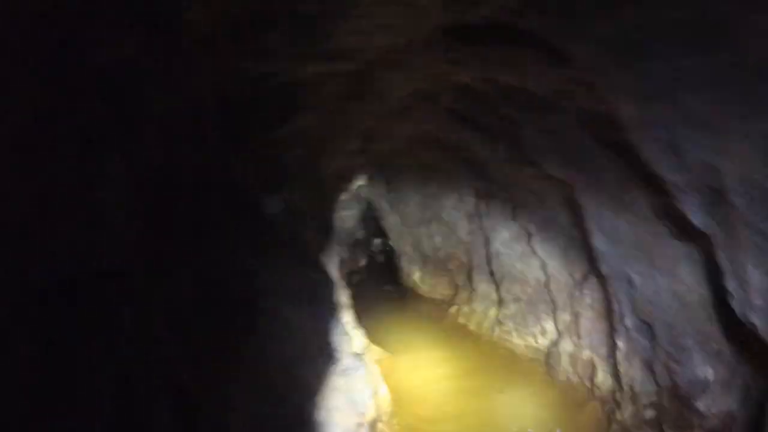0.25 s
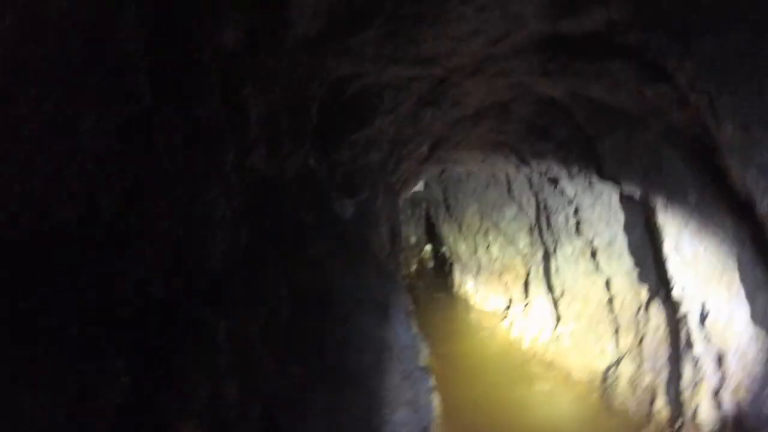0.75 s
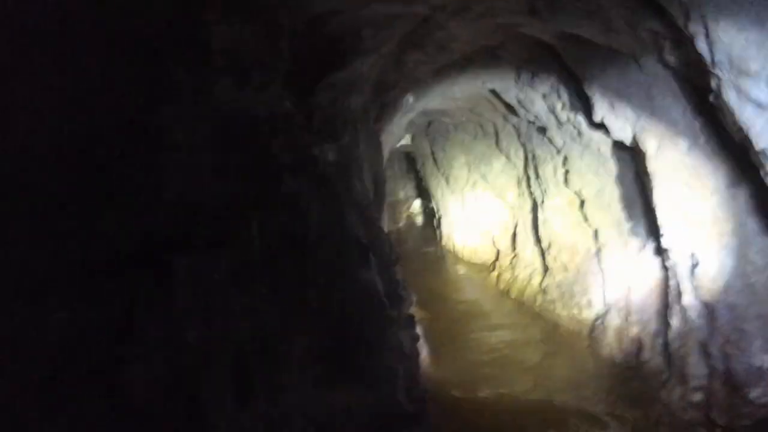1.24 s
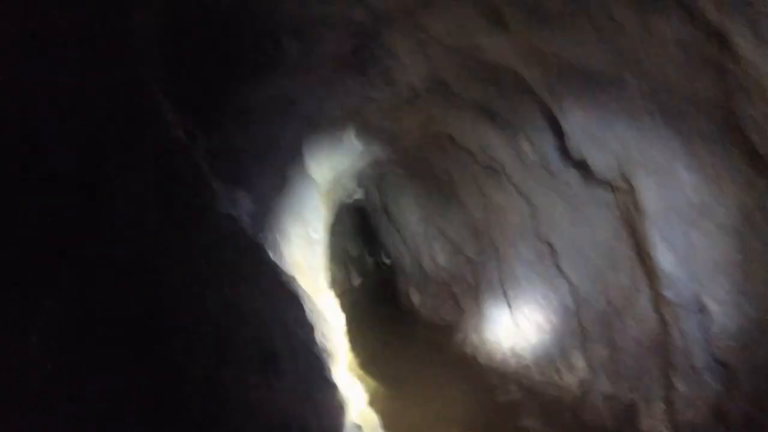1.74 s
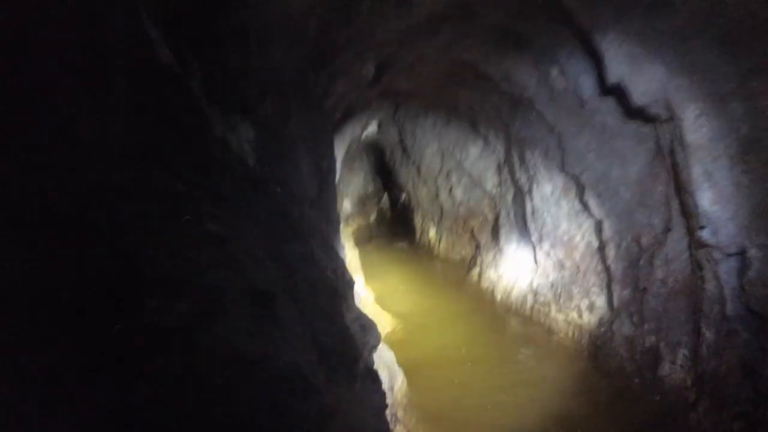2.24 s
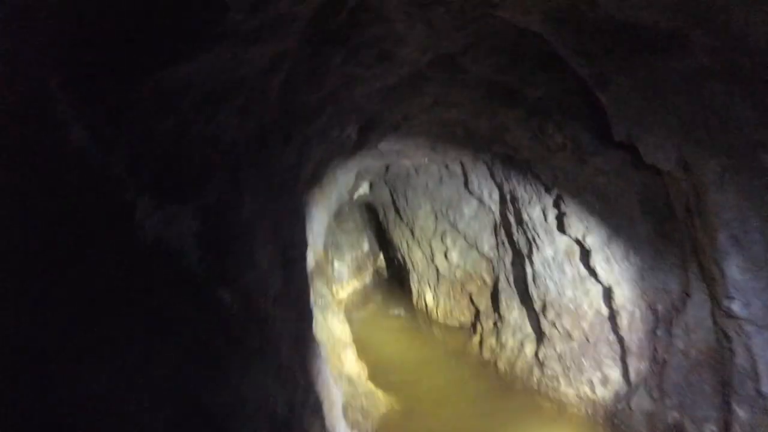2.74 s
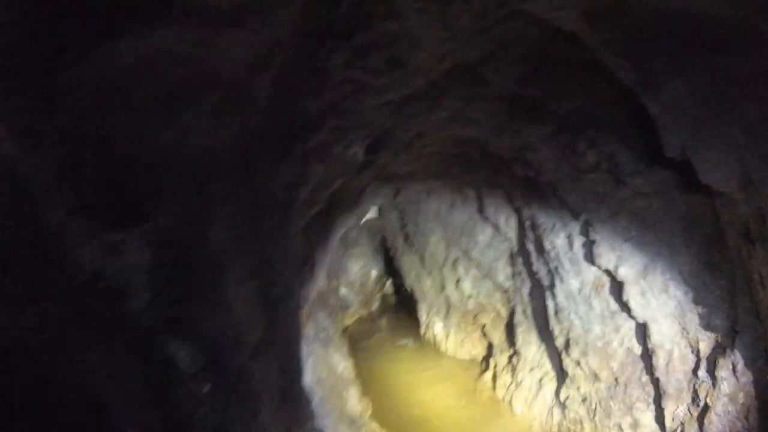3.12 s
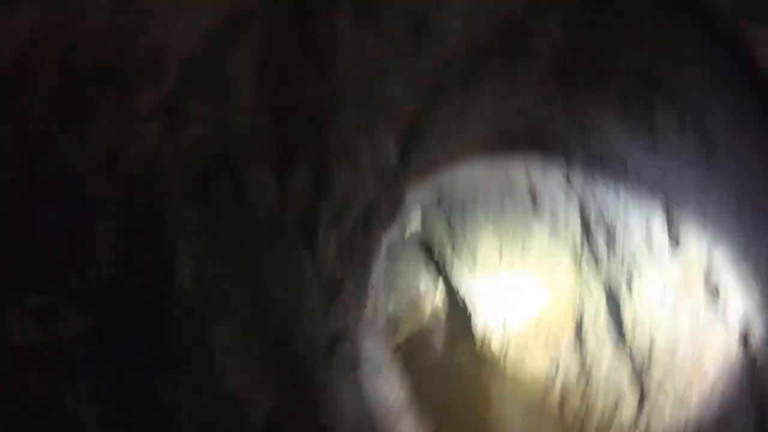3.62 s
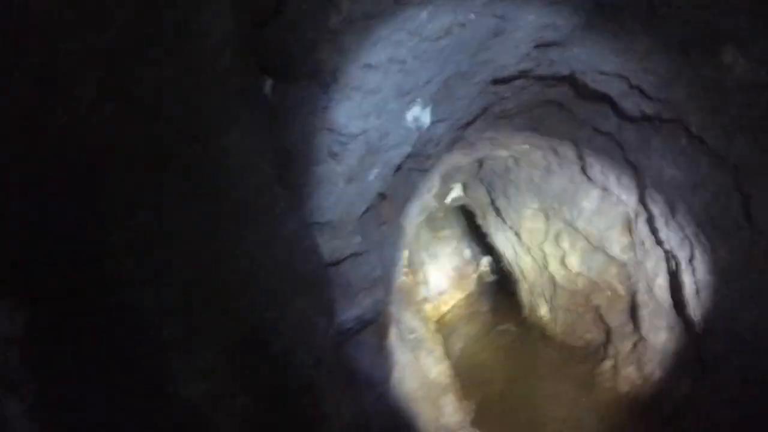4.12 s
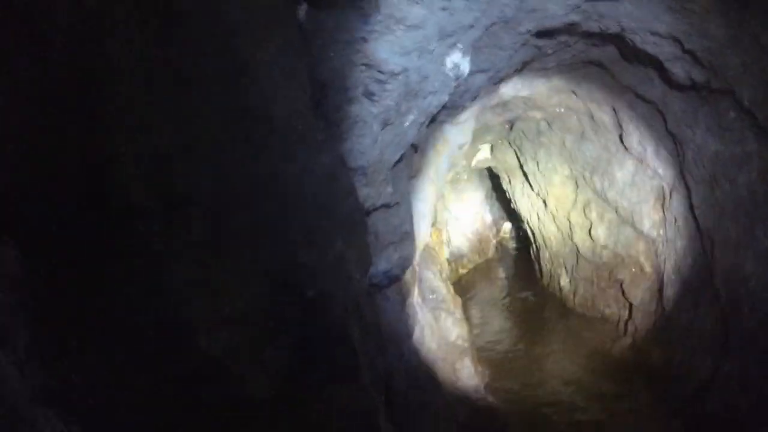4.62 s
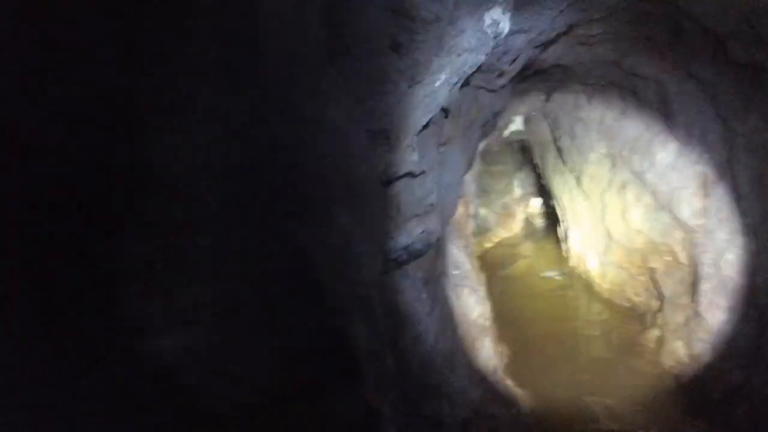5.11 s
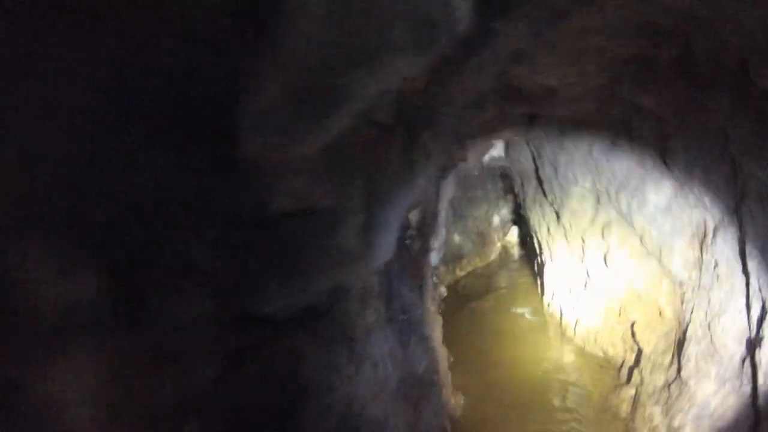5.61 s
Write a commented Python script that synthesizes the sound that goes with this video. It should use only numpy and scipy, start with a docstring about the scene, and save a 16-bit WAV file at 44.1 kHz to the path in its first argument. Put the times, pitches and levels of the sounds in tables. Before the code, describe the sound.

Someone wades slowly through shallow water in a narrow flooded rock tunnel, heard from a body-worn microphone in a hard plastic case. A quiet swish begins, with small ticks at 0.1-0.4 s, and swells into a bubbly rush around 0.6-1.2 s with low slosh trailing behind and fine spray on top. The water eases while a cluster of close clicks, hollow bumps and short grating rubs rattles the case from 1.6 to 2.2 s. A second fuller stride surges at 2.5-3.4 s, then fades. A sharp click and knocks hit at 3.6-3.8 s, with a lone soft thump at 4.2 s. Water rises again from 4.3 s; at 4.8 s a very loud, hollow bang overloads, followed by rattling and scraping until about 5.05 s. After lighter bumps and a lull, another splashy stride grows from 5.4 s to the end. Low rumble, bass drone, wavering ripples and thin hiss lie beneath.

```python
"""Water swishes softly, then swells as someone wades slowly through the shallows of a narrow rock tunnel.
Bubbles on rushing noise make the water, coloured by the plastic case of the camera that hears it.
Ticks, bumps and knocks of the mount ring the damped modes of the case as the wearer moves; drags grate.
Rumble, drone, ripples and hiss are shaped noise lying beneath; the hardest blows overload the input."""
import sys
import numpy as np
from scipy import signal
from scipy.fft import rfft, irfft, next_fast_len
from scipy.io import wavfile
from scipy.ndimage import map_coordinates

SR = 44100
rng = np.random.default_rng(int(sys.argv[2]) if len(sys.argv) > 2 else 0)


def makeup_ratio(level_db):
    """Linear amplitude ratio for a level in decibels (20 dB per factor of ten)."""
    decades = np.asarray(level_db, float) / 20
    return 10 ** decades


def digitize_waveform(pressure):
    """Quantize a signal to 16-bit integers and store it at the path in sys.argv[1].

    Rows of a 2-D input are taken as channels; values are limited to [-1, 1].
    """
    field = np.atleast_2d(pressure).T
    bounded = np.clip(field, -1, 1)
    quanta = np.round(bounded * 32767).astype(np.int16)
    wavfile.write(sys.argv[1], SR, quanta)


N = 258426  # length [samples]


def unit(x):
    """Scaled to rms 1."""
    return x / np.sqrt(np.mean(x ** 2) + 1e-20)


def along(points, hz):
    """Curve of (frequency [Hz], value) points, read on a log frequency axis."""
    f, value = np.transpose(points)
    return np.interp(np.log(hz + 1), np.log(f + 1), value)


def over_time(points, lag=0):
    """Curve of (time [s], value) points, read at every sample, lag seconds late."""
    return np.interp(np.arange(N) / SR - lag, *np.transpose(points))


def noise():
    """White noise, the raw stuff of every rush, rumble and hiss."""
    return rng.standard_normal(N)


def coloured(x, spectrum):
    """x filtered to the spectrum's tilt, at rms 1."""
    size = next_fast_len(N + 8192)
    gain = makeup_ratio(along(spectrum, np.fft.rfftfreq(size, 1 / SR)))
    return unit(irfft(rfft(x, size) * gain, size)[:N])


def wobble(rate):
    """A smooth random curve, rate knots a second."""
    knots = rng.standard_normal(int(N * rate / SR) + 4)
    return map_coordinates(knots, [np.arange(N) * rate / SR])


def bubbles(count, hz, octaves, cycles, size_db):
    """Bubbles at random moments: short rings whose pitch rises as they near the surface."""
    when, pitch, size = rng.random(count), rng.standard_normal(count), rng.standard_normal(count)
    f = np.clip(hz * 2 ** (octaves * pitch), 200, 15000)[:, None]
    ticking = np.arange(500)
    t = ticking[None] / SR
    life = f * t / cycles
    ring = np.sin(2 * np.pi * f * t * (1 + 0.099 * life)) * life * np.exp(-3 * life)
    sized = makeup_ratio(size_db * size)[:, None] * ring
    at = (when * N).astype(int)[:, None] + ticking
    return unit(np.bincount(at.ravel(), sized.ravel(), N)[:N])


# how hard the legs push the water, four strides that swell and settle: (time [s], swish level [dB])
PUSH = [(0.0, -53), (0.2, -45), (0.36, -47), (0.59, -39.5), (0.96, -38), (1.42, -41.5), (1.86, -45.5),
        (2.3, -44.5), (2.64, -36.5), (3.13, -36), (3.43, -45), (3.7, -48), (4.1, -52.5), (4.28, -42),
        (4.42, -36), (4.55, -34), (4.74, -33), (4.87, -38.5), (5.21, -48.5), (5.45, -39.5), (5.63, -38.5),
        (5.75, -34.5), (5.86, -36)]


def pushed(full_db, slope, still_db, lag):
    """Gain of a layer that grows slope dB per dB of push, lag seconds late, over a still-water floor."""
    above_full_db = over_time(PUSH, lag) + 38  # full_db is reached at a push of -38 dB
    return np.hypot(makeup_ratio(full_db + slope * above_full_db), makeup_ratio(still_db))


# short surges of the splash: (time [s], rise [dB], length [s])
SURGES = [(0.155, 7, 0.0088), (0.64, 5.5, 0.031), (0.924, 3, 0.027), (1.1, 1.5, .04), (2.512, 7.5, 0.023),
          (2.707, 1.5, .018), (2.876, 3.5, .036), (2.972, 4.5, 0.011), (3.147, 7.5, 0.02), (3.395, 6, .011),
          (4.697, 10.5, .018), (5.469, 5.5, .012), (5.522, 4, 0.022), (5.78, 2, 0.027)]


def splash_rise():
    """Gain of the brief surges, each a bell-shaped swell in decibels."""
    t = np.arange(N) / SR
    return makeup_ratio(sum(db * np.exp(-.5 * ((t - at) / length) ** 2) for at, db, length in SURGES))


# swish through the case wall, sum and difference of the ports: (frequency [Hz], relative level [dB per Hz])
SWISH_SUM = [(530, -31.5), (900, -16.5), (1080, -17.5), (1215, -1), (1340, -10.5), (1490, -9),
             (1650, -11.5), (2040, -6.5), (2550, -16), (3280, -21), (3520, -9.5), (4200, -18.5),
             (6420, -28), (7570, -65), (9000, -45), (11700, -78)]
SWISH_DIFFERENCE = [(530, -57), (900, -24), (1060, -20.5), (1240, -6), (1400, -11), (2000, -15.5),
                    (2400, -15.5), (3430, -4), (4770, -9), (5400, -4), (5950, -11), (7280, -10),
                    (9000, -20.5), (11700, -57), (19800, -120)]


def swish(flutter, rise):
    """Bubbly rushing noise follows the push; the difference port carries its own noise, so the ports differ in
    the treble."""
    push = makeup_ratio(over_time(PUSH)) * rise
    froth = 0.55 * bubbles(count=4000, hz=1711.5, octaves=0.713, cycles=11.95, size_db=0.5)
    mid = makeup_ratio(0.5) * coloured(flutter * (froth + noise()), SWISH_SUM)
    side = makeup_ratio(-8.5) * coloured(flutter * (0.1 * froth + noise()), SWISH_DIFFERENCE)
    return push * np.array([mid, side])


# deep slosh: (frequency [Hz], relative level [dB per Hz])
SLOSH_COLOUR = [(160, -28), (270, -4), (435, -9), (469, -3.5), (566, -9), (835, -5), (1100, -15.5),
                (1430, -32), (2420, -120)]


def slosh(rise):
    """Low, lumpy noise with a few large bubbles trails the push and surges less than the swish."""
    gain = pushed(full_db=-48, slope=1.32, still_db=-58.5, lag=0.17) * rise ** 0.47
    glug = 0.096 * bubbles(count=600, hz=558.0, octaves=0.554, cycles=11.0, size_db=1.5) + noise()
    mid = coloured(makeup_ratio(2.34 * wobble(18)) * glug, SLOSH_COLOUR)
    side = makeup_ratio(-19.0) * coloured(noise(), SLOSH_COLOUR)
    return gain * np.array([mid, side])


# fine spray: (frequency [Hz], relative level [dB per Hz])
SPRAY_COLOUR = [(5000, -38), (8500, -11), (9580, 0), (10400, -2), (12500, 5), (15200, 2)]


def spray(flutter, rise):
    """Fluttering treble noise close behind the push, nearly as strong in the difference as in the sum."""
    gain = pushed(full_db=-58.5, slope=1.04, still_db=-71, lag=0.05) * rise ** 1.13
    mid = coloured(flutter * noise(), SPRAY_COLOUR)
    side = makeup_ratio(-1.0) * coloured(flutter * noise(), SPRAY_COLOUR)
    return gain * np.array([mid, side])


def water():
    """Swish, slosh and spray share the surges; swish and spray also share one quick random flutter."""
    flutter = makeup_ratio(0.4 * wobble(12) + 1.61 * wobble(35))
    rise = splash_rise()
    return swish(flutter, rise) + slosh(rise) + spray(flutter, rise)


# rumble of the body: (frequency [Hz], relative level [dB per Hz])
RUMBLE_COLOUR = [(76, -49), (130, -6), (167, 0), (204, 3), (300, -6), (390, -37), (660, -120)]


def body_rumble():
    """Body movement through the mount: lumpy low noise in the sum, steady and weaker in the difference."""
    lumps = makeup_ratio(6.5 * wobble(25) + 2.1 * wobble(3.54))
    mid = makeup_ratio(-56) * unit(lumps * coloured(noise(), RUMBLE_COLOUR))
    side = makeup_ratio(-68.5) * coloured(noise(), RUMBLE_COLOUR)
    return np.array([mid, side])


# low drone: (frequency [Hz], relative level [dB per Hz])
DRONE_COLOUR = [(15, -33), (25, 5), (43, -19), (75, -1.5), (130, -12.5), (170, -38), (290, -120)]


def low_drone():
    """Narrow bands of bass noise whose level drifts, alike in both ports."""
    mid = makeup_ratio(-56.5 + 2.8 * wobble(4.2)) * coloured(noise(), DRONE_COLOUR)
    return np.array([mid, np.zeros(N)])


# the wake of each stride lapping the walls: (time [s], level [dB])
WAKE = [(0.23, -64), (0.44, -44), (0.83, -46), (1.45, -55), (2.3, -58), (2.71, -43), (3.6, -52.5),
        (3.85, -46), (4.28, -48), (4.42, -43), (4.85, -42), (5.16, -56), (5.4, -56), (5.72, -39),
        (5.86, -45)]
# ripples down the tunnel: (frequency [Hz], relative level [dB per Hz])
RIPPLE_COLOUR = [(530, -57), (900, -44), (1040, -28), (1160, -10), (1390, -7.5), (1520, -3.5),
                 (1860, -21.5), (2600, -27), (3380, -65), (5720, -120)]


def ripples():
    """Midrange noise swells with the wake and wavers at random, alike in both ports."""
    mid = makeup_ratio(over_time(WAKE) + 2.7 * wobble(9)) * coloured(noise(), RIPPLE_COLOUR)
    return np.array([mid, np.zeros(N)])


# input hiss: (frequency [Hz], relative level [dB per Hz])
HISS_COLOUR = [(1470, -54), (2500, -20.5), (4400, -4), (4900, -1), (5400, -6), (7310, -8.5), (15200, -7)]


def input_hiss():
    """The input's own steady noise, independent in sum and difference."""
    return makeup_ratio(-59) * np.array([coloured(noise(), HISS_COLOUR) for _ in range(2)])


# modes of case and mount, t60 being the longest each can ring:
# (frequency [Hz], t60 [s], relative sum level [dB], relative difference level [dB])
CASE_MODES = [(94, .1, -2.5, -32), (146.2, .08, -6.5, -61.5), (240, .12, 2.5, -34.5),
              (344, 0.048, -13, -31.5), (468, 0.021, -17, -35), (685, 0.023, -2.5, -28),
              (930, 0.032, -9, -23), (1243, 0.052, -9, -27), (1531, 0.022, -10.5, -24),
              (1814, 0.016, -10, -14.5), (2213, 0.018, -7, -27), (2796, 0.015, -7, -14),
              (2463, 0.014, -14, -16), (3100, 0.0093, -13, -1.5), (3460, 0.0095, 6, 6),
              (4110, 0.011, -16, -5), (4730, 0.0036, 3, -19), (5230, 0.0094, -15, -6.5),
              (6350, 0.0067, -14, -2), (7890, 0.0028, -7, -2.5), (10100, .004, -27, -36),
              (11240, 0.0043, -9.5, -22), (13620, 0.0057, -10, -52), (14700, .004, -36, -41)]


def blows(events, top_hz, lag, attack, spread_db):
    """Each contact rings the modes around its pitch; the nearest mode bends to it.

    events: (time [s], sum peak [dB], pitch [Hz], octaves below, octaves above, t60 limit [s], chatter [s])
    """
    out = np.zeros((2, N + SR))
    t = np.arange(SR // 12) / SR
    hz, t60, *port_db = np.array(CASE_MODES).T[:, :, None]
    for s, db, pitch_hz, below, above, grip_t60, chatter in events:
        away = np.log2(hz / pitch_hz)
        bent = np.where(abs(away) == abs(away).min(), pitch_hz, hz)
        reach = np.where(away > 0, above, below)
        share = np.exp(-.5 * (away / reach) ** 2) * makeup_ratio(spread_db * rng.standard_normal(hz.shape))
        turn = 2 * np.pi * bent * t
        # the contact chatters briefly, which blurs a mode's onset but hardly its strength
        slips = rng.standard_normal(800) * np.exp(-t[:800] / chatter)
        drive = abs(np.exp(1j * turn[:, :800]) @ slips)[:, None]
        share = share / (drive + 0.28 * np.linalg.norm(slips))
        share = share / (1 + (hz / top_hz) ** 10)  # a soft contact cannot reach the high modes
        decay = np.exp(-np.log(1000) * t / np.minimum(t60, grip_t60))
        ring = share * decay * (1 - np.exp(-t / attack)) ** 2
        # sum and difference ring a quarter cycle apart: one port leads the other
        pair = (makeup_ratio(np.array(port_db)) * ring * [np.sin(turn), np.cos(turn)]).sum(axis=1)
        same_way = -np.sign(slips[0]) * slips  # every first slip pushes the same way
        pair = signal.fftconvolve(pair, same_way[None], axes=1)[:, :len(t)]
        start = round((s + lag) * SR)
        out[:, start:start + len(t)] += makeup_ratio(db) * pair / abs(pair[0]).max()
    return out[:, :N]


def soft_blows(events):
    """Soft contacts of the mount swell in slowly and reach only the low modes."""
    return blows(events, top_hz=860, lag=0.00273, attack=.0011, spread_db=4.0)


# sharp ticks of the buckle, each thumping the mount:
# (time [s], tick level [dB], brightness [octaves above], thump level [dB])
TICKS = [(0.1405, -26.5, 2.9, -41), (0.3376, -20, 1.1, -28.5), (0.403, -7, 1.4, -22),
         (0.6812, -11, 3.5, -26.5), (0.8915, -22.5, 1, -25.5), (1.091, -16, 1.6, -24),
         (1.1659, -10, 3.8, -20.5), (1.4027, -23, .7, -26), (1.6782, -5, 2.1, -25), (1.7836, -5, 1.8, -27),
         (2.0414, -5, 2.1, -21.5), (2.1005, -11.5, 2.6, -23.5), (3.6486, -19.5, 3.3, -32),
         (3.7075, 1.5, 5.4, -25), (4.6874, -25, 1.8, -26), (4.8278, -0.5, 1.8, -25),
         (4.8933, -19.5, 2.6, -27), (4.9336, -27, 1.8, -25), (4.99, -32.5, 1.8, -30),
         (5.025, -2.5, 5.4, -31), (5.4439, -20.5, 1, -28), (5.5348, -20, 1.2, -28)]


def buckle_ticks():
    """A hard, brief contact rings the high modes; the mount thumps below it and springs back once."""
    ticks = [(s, db, 3700, 1.7, bright, .02, .00015) for s, db, bright, _ in TICKS]
    rebound_s, rebound_db = .029, -9.5
    thumps = [(s + k * rebound_s, db + k * rebound_db, 246, 0.44, .8, 0.059, 1e-5)
              for s, _, _, db in TICKS for k in range(2)]
    return blows(ticks, top_hz=18000, lag=.0006, attack=0.00023, spread_db=1.5) + soft_blows(thumps)


# soft bumps of the mount; a shallow bump sounds one clear mode:
# (time [s], level [dB], pitch [Hz], depth [octaves below])
BUMPS = [(0.246, -37, 195, .8), (0.274, -37, 232, 0.99), (0.306, -30.5, 228, 0.65),
         (0.459, -32.5, 240, 0.71), (0.571, -38, 203, 0.84), (0.791, -33, 247, .75), (0.827, -35, 191, .8),
         (1.242, -35, 214, .9), (1.271, -33, 246, .9), (1.478, -31, 214, .8), (1.526, -38, 228, 1),
         (1.593, -31.5, 254, .8), (1.617, -27.5, 222, .7), (1.632, -5.5, 250, 0.95),
         (1.703, -22, 192, 0.83), (1.715, -9, 233, 1), (1.732, -14.5, 286.4, 0.9), (1.747, -20, 280, 0.84),
         (1.767, -12.5, 288, 1), (1.784, -16, 270, 0.94), (1.838, -15, 228, 0.94), (1.867, -28.5, 264, 1),
         (1.917, -16, 188.3, 0.5), (1.925, -11, 244, 0.97), (1.967, -17.5, 195, 1), (1.981, -16.5, 230, .8),
         (2.033, -15.5, 246, 0.76), (2.184, -33.5, 237, 1), (2.232, -26, 203, 0.96), (2.566, -35, 239, .8),
         (2.993, -33, 225, .8), (3.086, -40, 245, .9), (3.156, -40, 234, .9), (3.319, -34.5, 226, .8),
         (3.344, -40, 218, .8), (3.586, -36.5, 200, 0.64), (3.633, -18, 200, .8), (3.644, -9.5, 235, 1),
         (3.68, -8.5, 203, 1), (3.691, -11, 225, .7), (3.76, -14.5, 232, .9), (3.773, -13.5, 191, 0.87),
         (4.139, -39, 226, 0.92), (4.173, -33, 225, .7), (4.206, -7, 214, .7), (4.303, -23, 226, 1),
         (4.828, 10, 258.3, 0.53), (4.834, 4.5, 274.6, 0.46), (4.891, -5.5, 258, .6),
         (4.904, -9, 237, 0.41), (4.921, -13.5, 259, 0.59), (4.95, -10.5, 224, .5), (4.964, -11, 207, .3),
         (4.977, -9, 250, .5), (5.014, -19, 213, 0.31), (5.027, -10.5, 191, 0.64), (5.039, -16, 222, 0.68),
         (5.142, -31, 268, .8), (5.157, -15.5, 229, 0.92), (5.199, -30, 245, .8), (5.249, -17, 195, .9),
         (5.309, -34, 229, 0.89), (5.359, -39, 250, 0.63), (5.707, -34, 210, .8)]


def mount_bumps():
    """Soft bumps ring the low modes; hard or deep ones damp sooner."""
    events = []
    for s, db, hz, depth in BUMPS:
        t60 = 0.035 * 2 ** (-.018 * (db + 21.5) - 1.8 * (depth - 1))  # 35 ms at -21.5 dB, 1 octave
        events.append((s, db, hz, depth, .8, t60, 1e-5))
    return soft_blows(events)


# harder knocks and rattles: (time [s], level [dB], pitch [Hz], brightness [octaves above])
KNOCKS = [(1.635, -29, 1230, 1.5), (1.678, -10.5, 1336, 1.5), (1.718, -8.5, 667, 1.4),
          (1.731, -16, 610, 2.2), (1.743, -12.5, 1310, 1.5), (1.756, -24, 1410, 1.5),
          (1.77, -14.5, 660, .8), (1.84, -26, 630, 0.85), (1.943, -27, 1230, 1.5), (1.977, -18.5, 684, 4.2),
          (2.035, -25, 655, 1.6), (2.149, -31.5, 1270, 3.3), (3.641, -11.5, 1370, .6),
          (3.649, -1, 1223, .9), (3.663, -26, 770, .7), (3.684, -20, 626, 1.7), (3.697, -19, 715, 1.3),
          (3.712, -19.5, 700, 0.8), (3.759, -20, 624, 0.76), (3.774, -29, 680, 1.3), (4.206, -27, 606, 1.2),
          (4.311, -29, 647, 0.47), (4.825, 13, 688, 1.55), (4.845, -8.5, 690, 1.5), (4.853, -6, 694, .8),
          (4.888, -6, 750, 2.8), (4.893, -4, 690, 2.3), (4.902, -10, 1010, 2.3), (4.908, -9, 625, 1.9),
          (4.914, -3.5, 1013, 0.35), (4.923, -12, 670, 1.5), (4.932, 2, 687, 0.78), (4.944, -8, 710, 1),
          (4.956, -15, 677, 2.2), (4.969, -17, 654, 1.6), (4.988, -15, 1390, 1.8), (5.001, -14.5, 640, .9),
          (5.011, -19.5, 684, 0.72), (5.024, -4, 882, 0.72), (5.035, -10.5, 754, 2.3)]


def mount_knocks():
    """Firmer contacts ring the middle modes after a short chatter; a hard knock is crisper."""
    events = []
    for s, db, hz, bright in KNOCKS:
        chatter = .0026 * 2 ** (-0.04 * (db + 15.5))  # 2.6 ms at -15.5 dB
        events.append((s, db, hz, .8, bright, .03, chatter))
    return blows(events, top_hz=2310, lag=0.0002, attack=0.00044, spread_db=1.0)


# drags of the mount: (start [s], end [s], level [dB])
SCRAPES = [(1.647, 1.681, -39), (1.693, 1.801, -35), (1.928, 1.998, -39.5), (2.113, 2.16, -56),
           (3.663, 3.73, -31.5), (3.773, 3.794, -41.5), (4.822, 4.866, -17), (4.887, 4.96, -18),
           (4.952, 5.002, -29), (4.996, 5.045, -26.5)]
# colour of the drags: (frequency [Hz], relative level [dB per Hz])
GRIND_COLOUR = [(200, -33), (380, -10), (560, -9), (690, 2), (840, -9.5), (980, -3.5), (1120, -14),
                (1450, -24), (1900, -13), (2250, -13), (2600, -34), (3400, -63), (5700, -120)]


def scrape():
    """The mount drags under load: dense grit in the low modes of the case."""
    t = np.arange(N) / SR
    stroke = np.zeros(N)
    for start, end, db in SCRAPES:
        fade = np.minimum((t - start) / 0.0031, (end - t) / 0.0099)  # fade-in and fade-out [s]
        stroke += makeup_ratio(db) * np.clip(fade, 0, 1)
    grit = makeup_ratio(7.2 * wobble(250)) * noise()
    mid = coloured(grit, GRIND_COLOUR)
    side = makeup_ratio(-24) * coloured(noise(), GRIND_COLOUR)
    return stroke * np.array([mid, side])


def scene():
    """Sum and difference of the ports become left and right."""
    background = body_rumble() + low_drone() + ripples() + input_hiss()
    highpass = signal.butter(2, 75, "high", fs=SR, output="sos")  # the contacts carry nothing below about 75 Hz
    contacts = signal.sosfilt(highpass, buckle_ticks() + mount_bumps() + mount_knocks())
    mid, side = water() + background + contacts + scrape()
    return np.array([mid + side, mid - side])


def low_pass(x):
    """Removes everything above the highest recorded frequency."""
    return signal.sosfilt(signal.butter(12, 16240, fs=SR, output="sos"), x)


def record(dry):
    """The input overloads: peaks flatten through a tight knee just under full scale."""
    clipped = dry / (1 + abs(dry / .99) ** 12) ** (1 / 12)
    return low_pass(clipped)


dry = scene()
out = record(dry)
digitize_waveform(out)
```